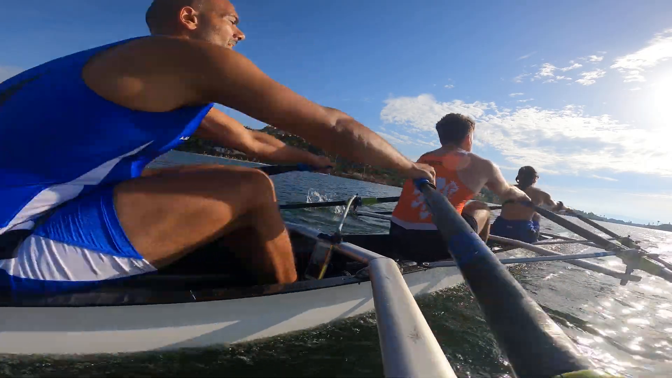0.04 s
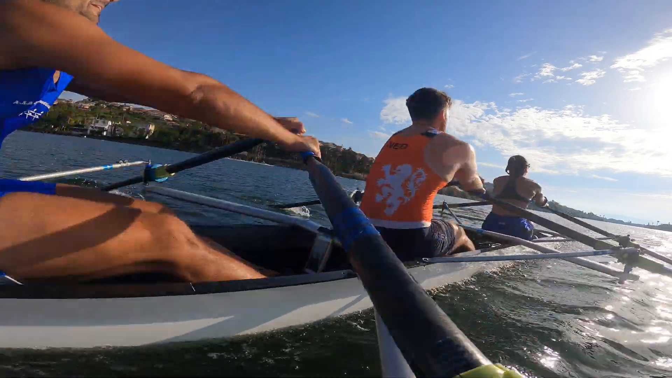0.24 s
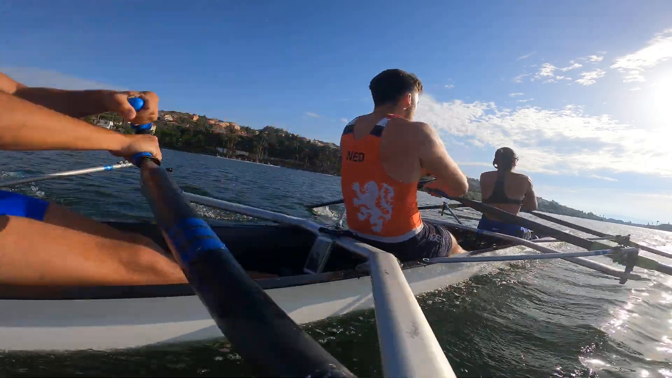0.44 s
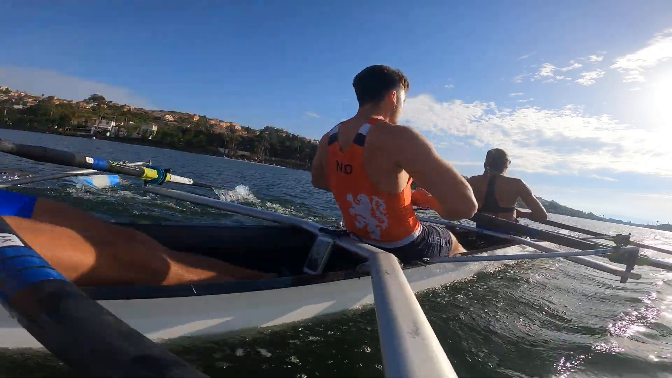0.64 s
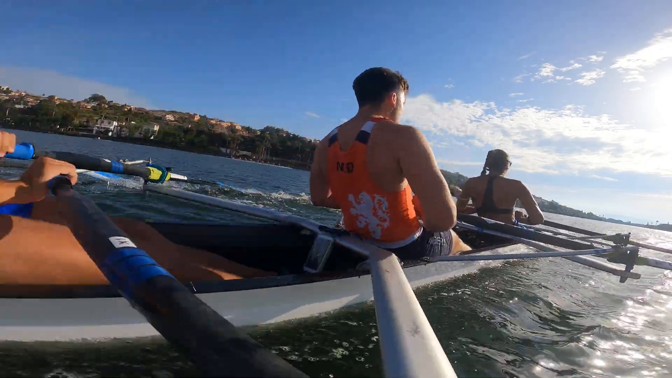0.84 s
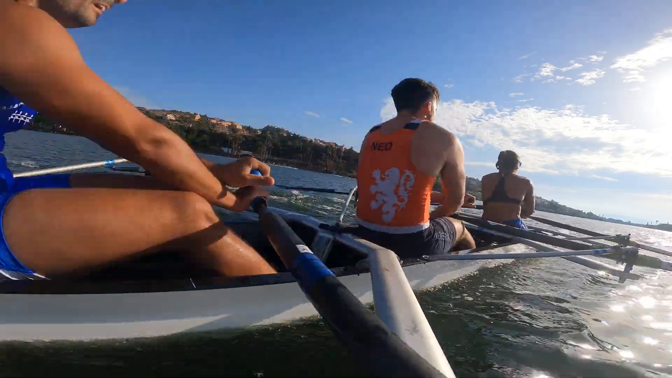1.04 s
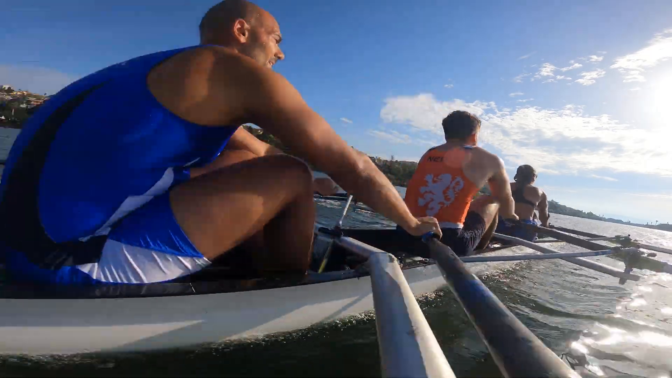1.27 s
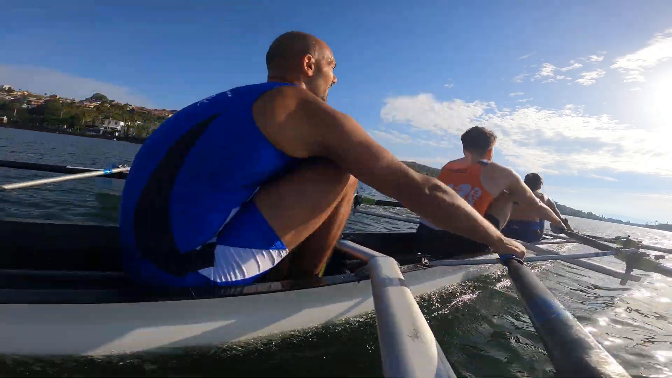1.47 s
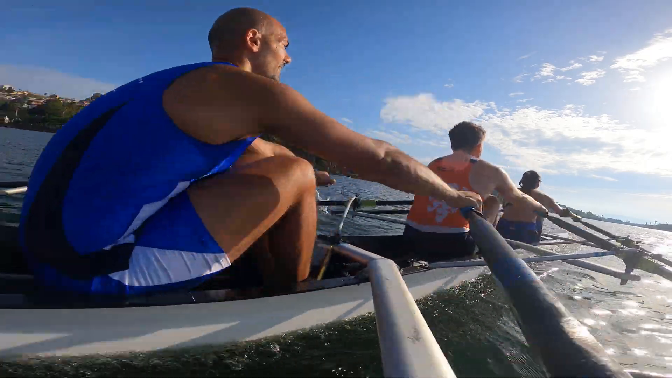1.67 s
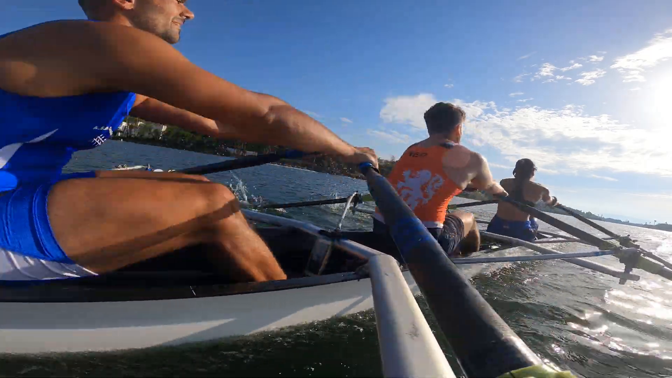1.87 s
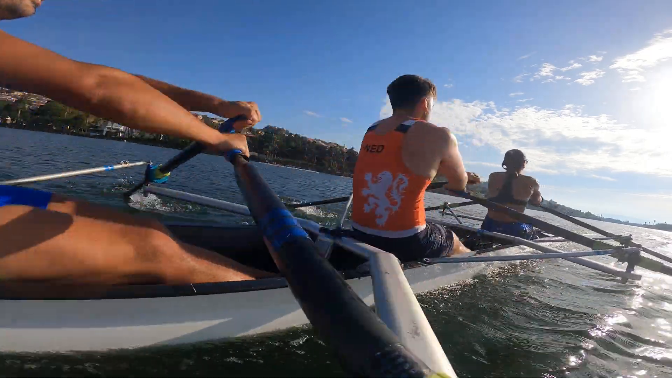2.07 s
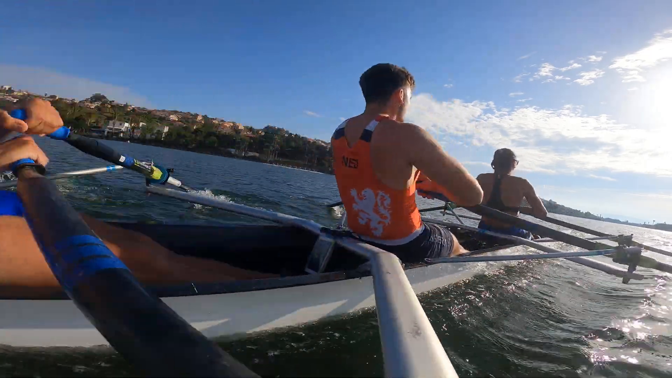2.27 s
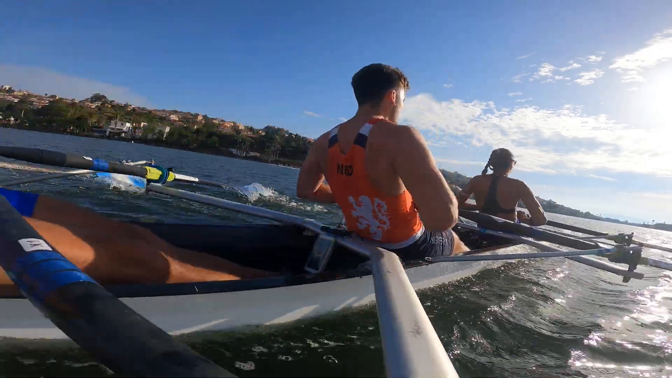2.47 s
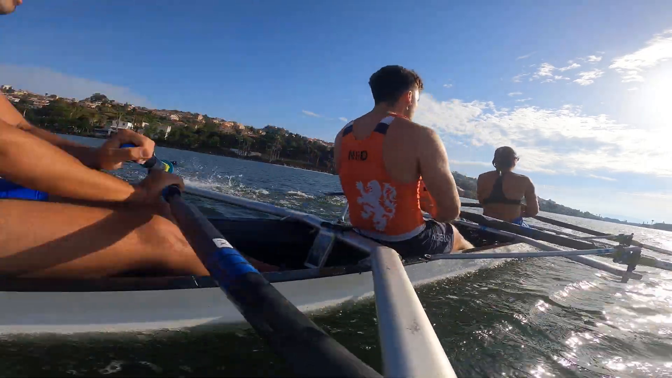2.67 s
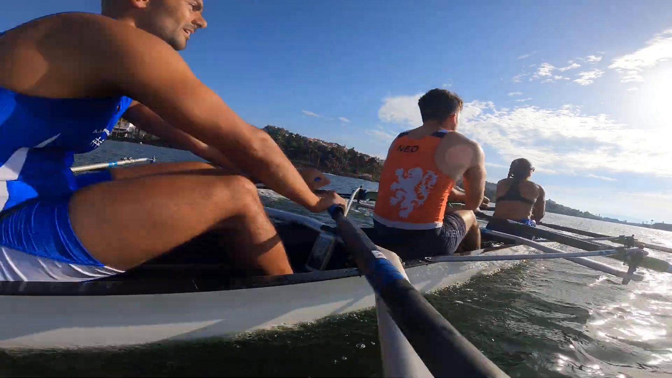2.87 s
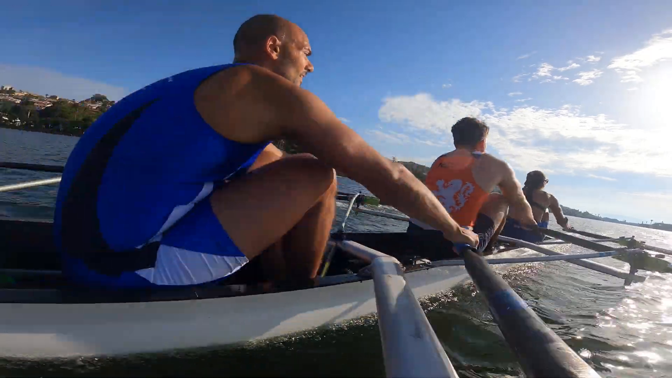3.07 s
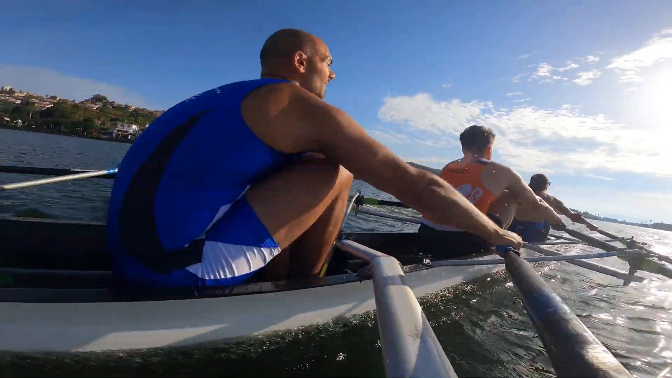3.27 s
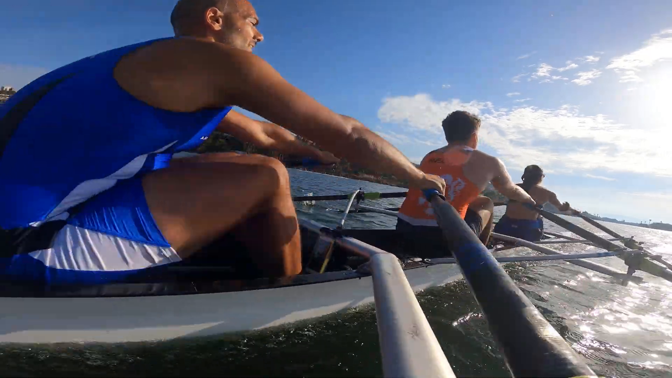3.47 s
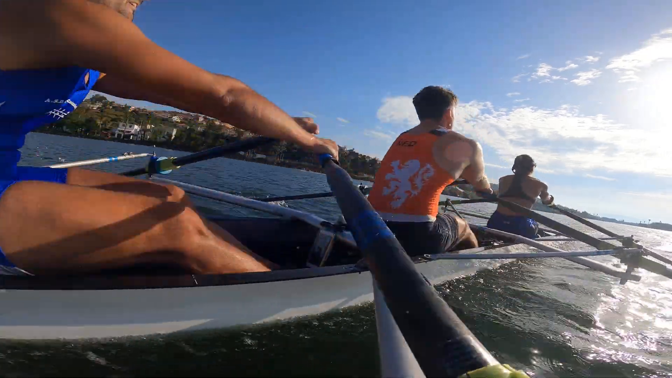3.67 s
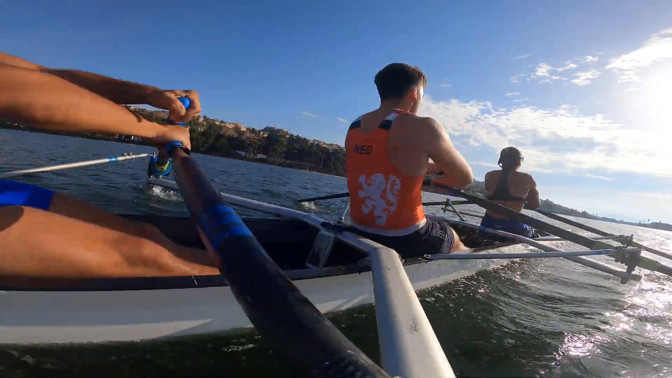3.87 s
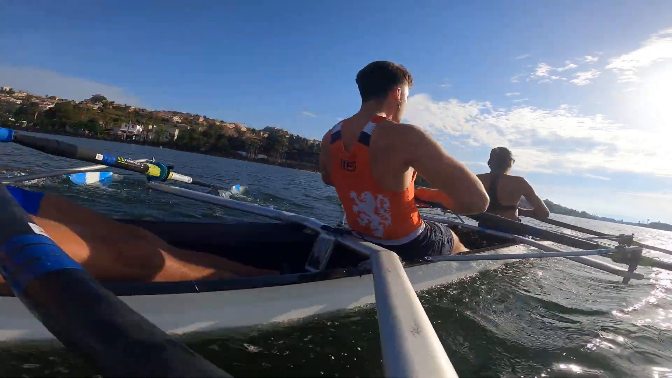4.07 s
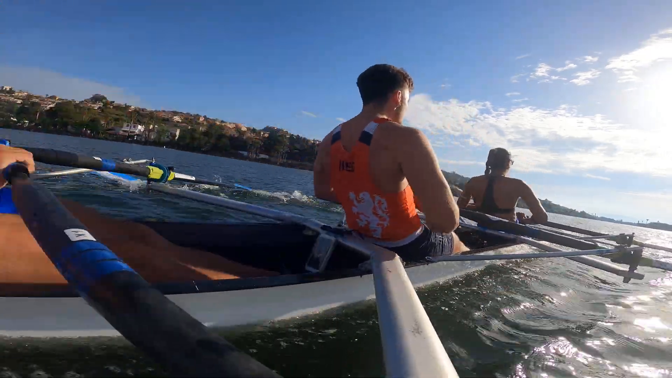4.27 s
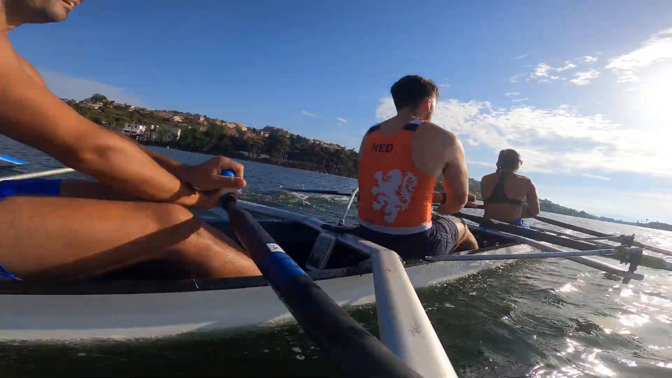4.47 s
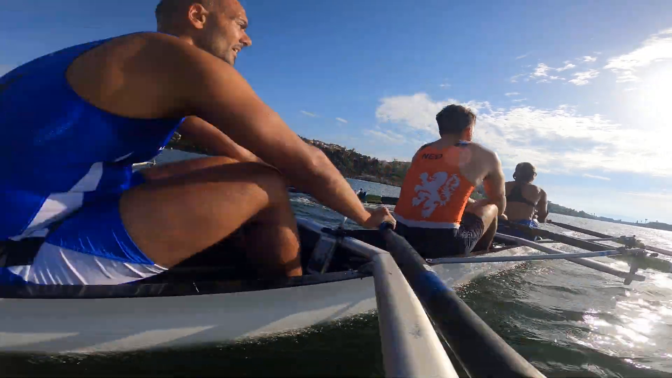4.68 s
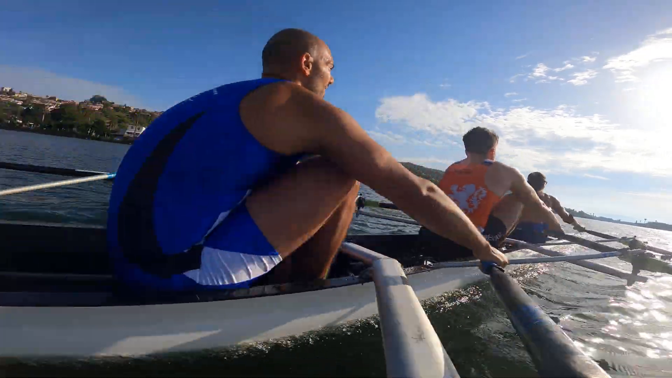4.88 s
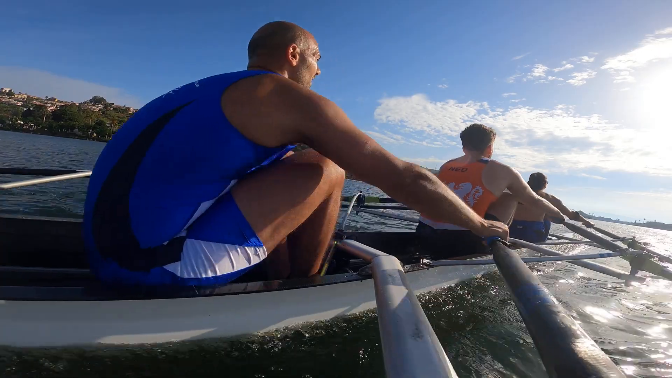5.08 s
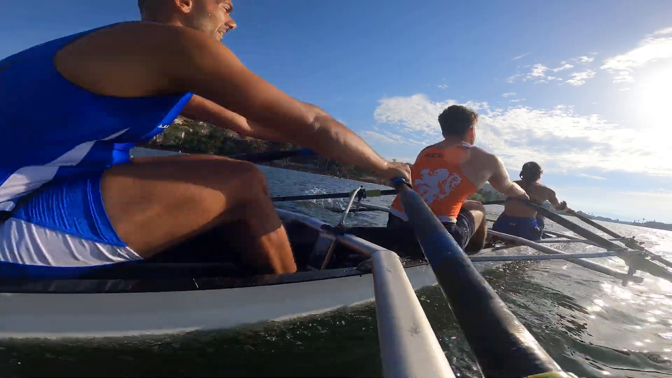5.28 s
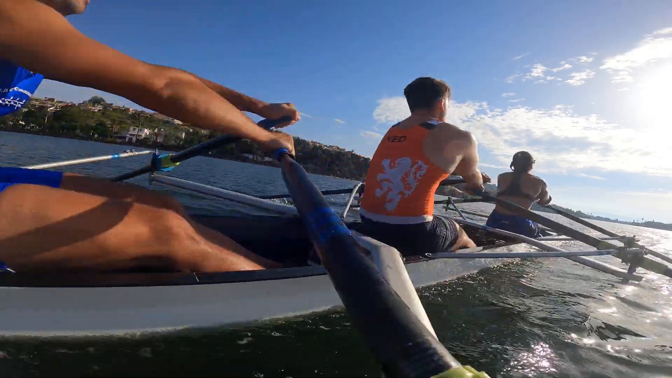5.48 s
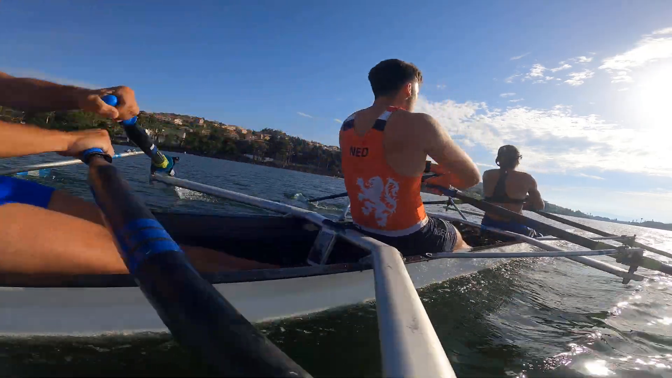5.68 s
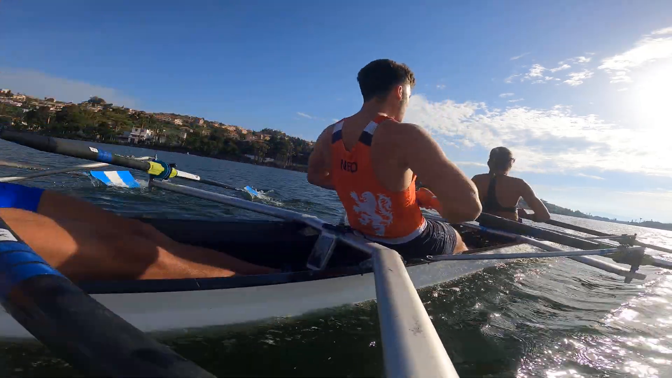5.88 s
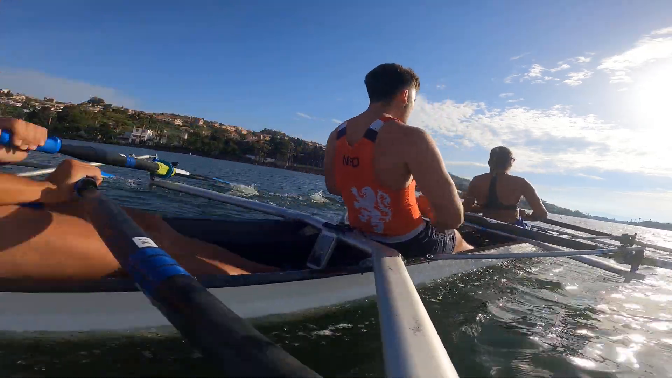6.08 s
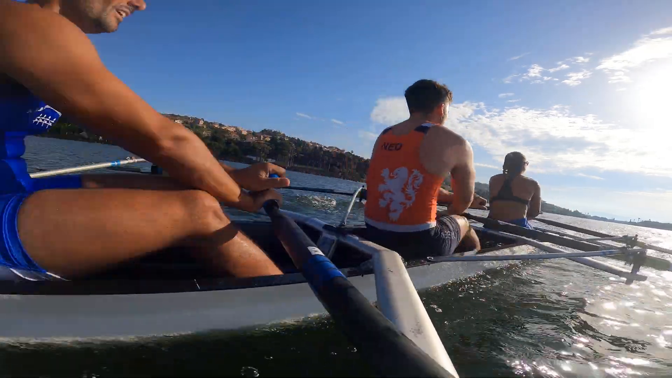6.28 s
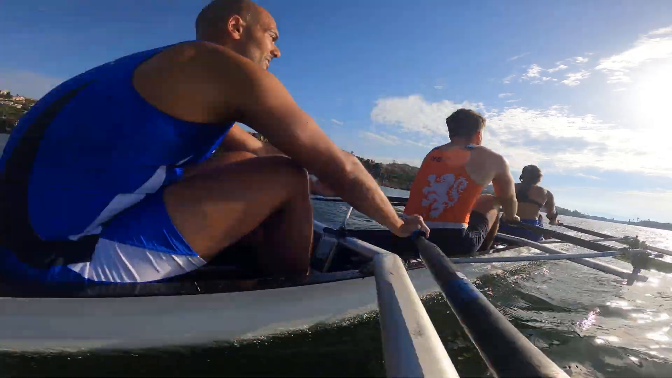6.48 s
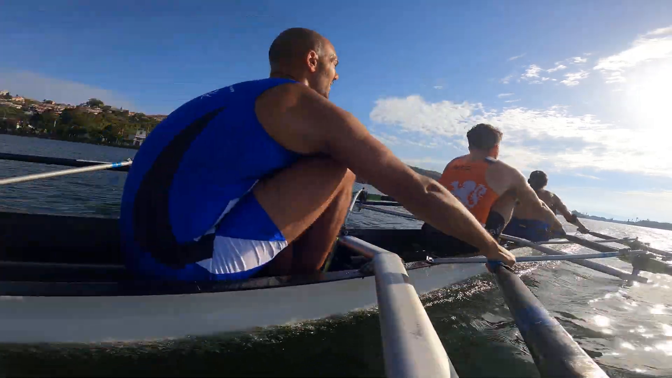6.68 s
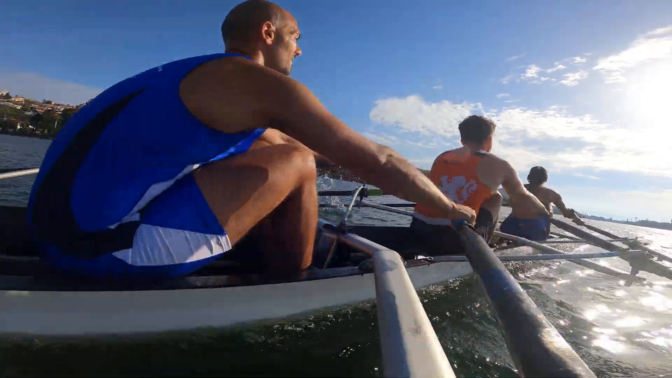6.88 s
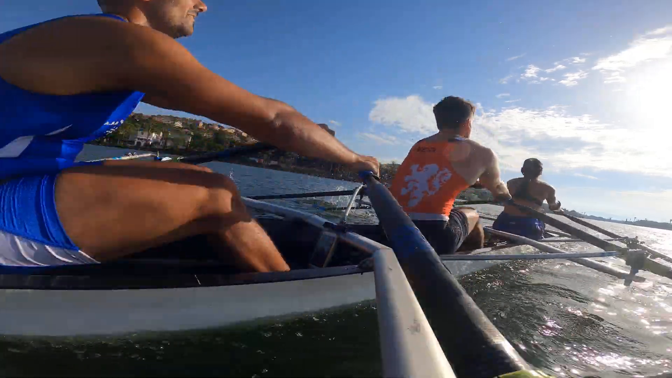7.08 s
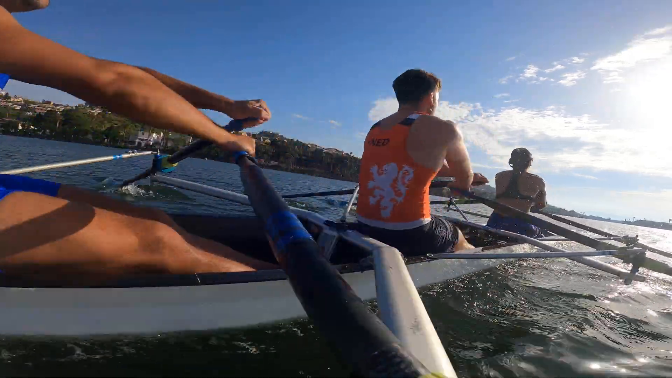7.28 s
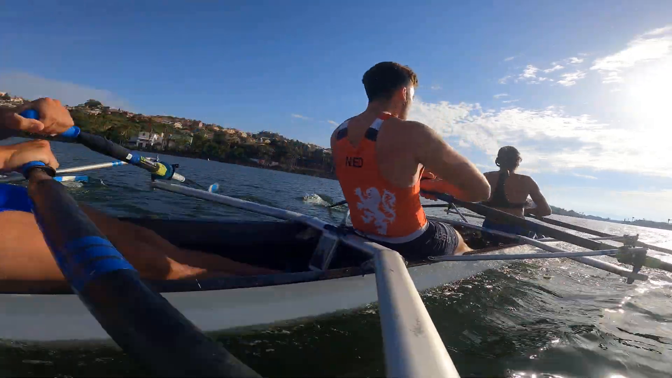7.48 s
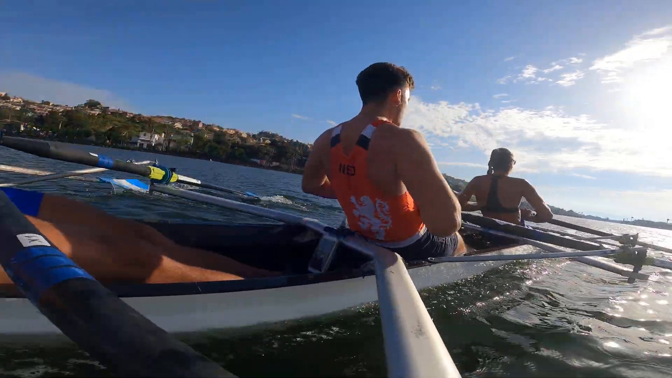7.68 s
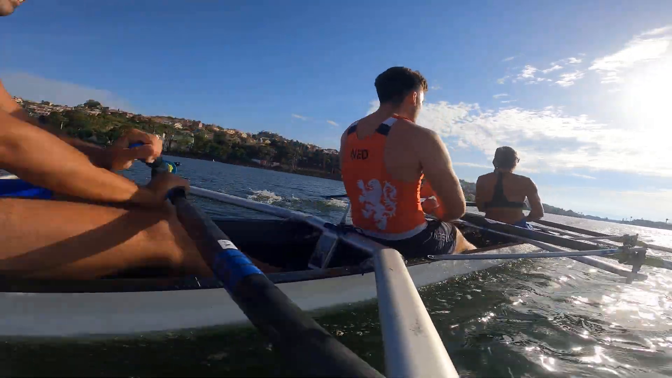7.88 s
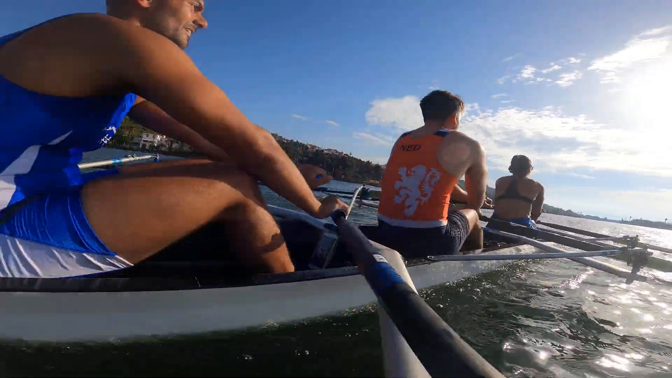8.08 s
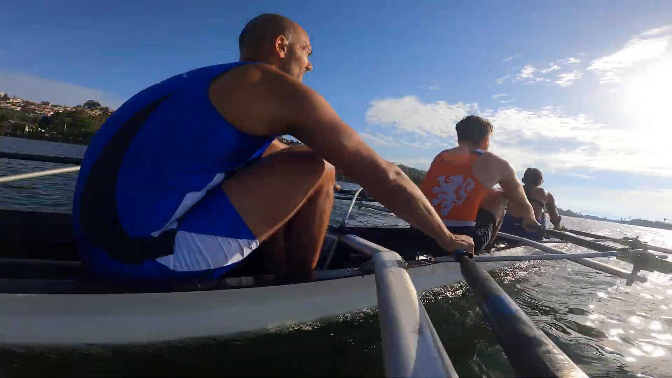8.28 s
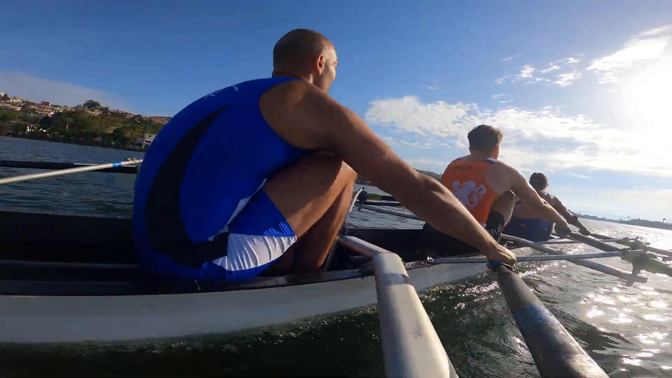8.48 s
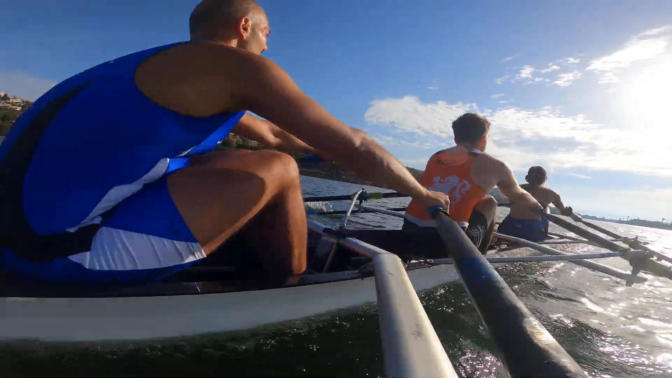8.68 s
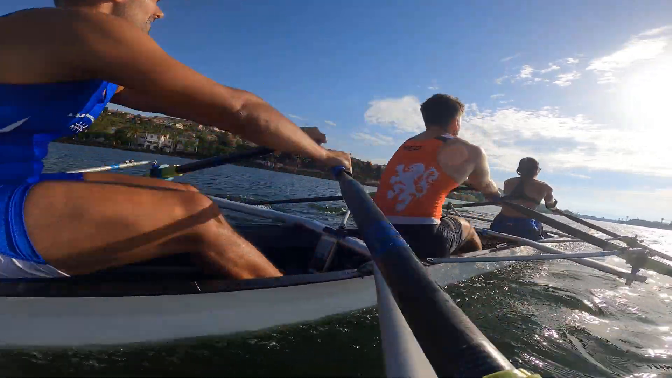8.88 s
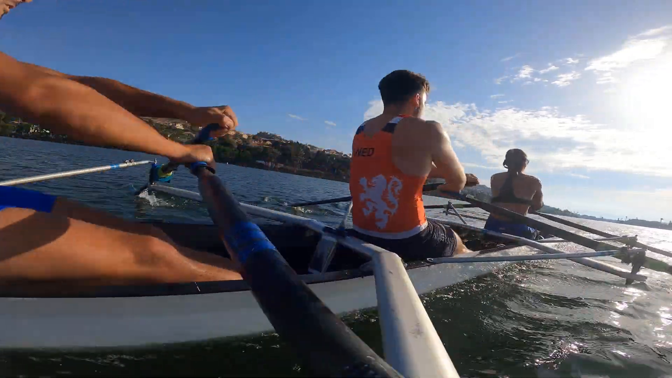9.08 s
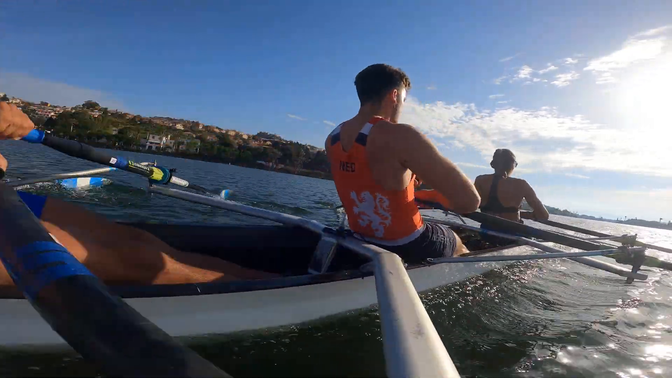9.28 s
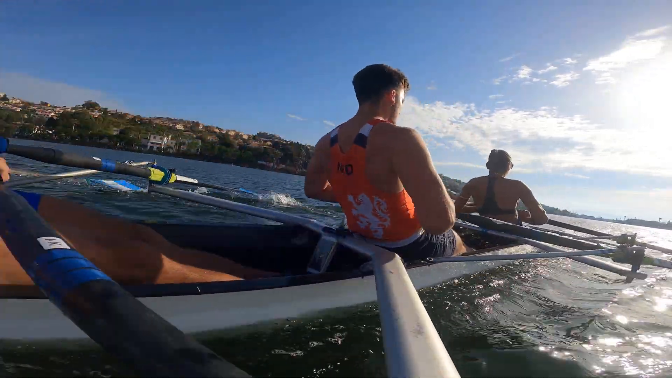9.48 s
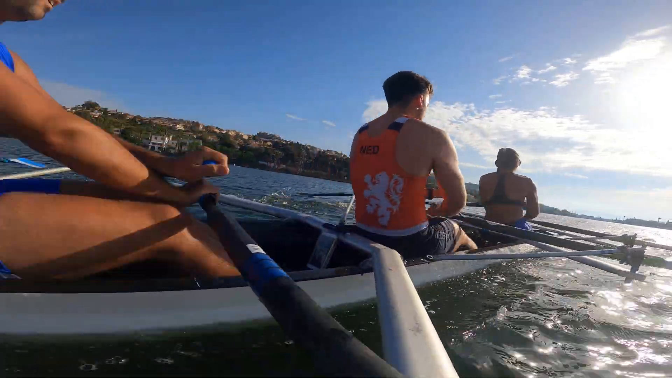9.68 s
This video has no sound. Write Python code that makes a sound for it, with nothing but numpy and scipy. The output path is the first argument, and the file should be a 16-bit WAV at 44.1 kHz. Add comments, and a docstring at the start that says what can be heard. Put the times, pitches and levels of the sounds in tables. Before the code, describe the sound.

Close to the water on a fast rowing boat, six strokes pass in just under ten seconds. Hollow seat rumbles with scrappy rattling accompany leg drives at about 0, 1.8, 3.5, 5.2, 6.9 and 8.7 s, each swelling with a rush of water. The rumble then drops away while the blades pull, leaving softer rushing. Sudden hull knocks and splashes mark the finishes near 0.7, 2.4, 4.2, 5.9, 7.6 and 9.4 s, with brief wavering oarlock squeals at all but the fifth. Rolling recoveries whirr from about 1.3, 3.0, 4.7, 6.4 and 8.2 s. Low soft booms sound as weight shifts. Bubbly trickles, spray and rounded gulps cluster irregularly, especially around 2.4-3, 6 and 9.5 s. Lumpy low wind buffets the microphone, strongest around finishes, beneath faint treble fizz and a few tiny bright ticks.

```python
"""A hull rumbles under rolling seats as water rushes past: a rowing four at race pace, close above the water.
Random bumps ring the hull modes, and soft pushes make the lowest one boom; free seat wheels whirr and rattle.
Grainy noise and small rings make the water rush, splash, trickle and gulp to the rhythm of the stroke.
At most strokes a wavering tone squeals as the oar turns in its lock.
Behind it lie wind noise buffeting the microphone, a treble fizz and hiss, and a few very bright ticks."""
import sys
import numpy as np
from scipy import signal
from scipy.io import wavfile
from scipy.ndimage import uniform_filter1d

SR = 44100
rng = np.random.default_rng(int(sys.argv[2]) if len(sys.argv) > 2 else 0)


def materialize(psi):
    """Save the field psi as 16-bit PCM at rate SR to the path in sys.argv[1].

    A 1-D psi becomes a single channel; in a 2-D psi each row is a channel.
    """
    bounded = np.clip(np.atleast_2d(psi).T, -1, 1)
    quanta = np.round(bounded * 32767).astype(np.int16)
    wavfile.write(sys.argv[1], SR, quanta)


N = 429534  # length in samples


def from_db(db):
    """Gain of a level in dB."""
    return 10 ** (np.asarray(db) / 20)


def power_db(power):
    """Level in dB of a power."""
    return 10 * np.log10(power)


def rms_one(x):
    """Scaled to rms 1."""
    return x / np.sqrt(np.mean(x ** 2) + 1e-20)


def in_time(rows, outside=None):
    """Columns after the time column, drawn as lines with one value a sample."""
    s, *columns = np.transpose(rows)
    return [np.interp(np.arange(N) / SR, s, c, outside, outside) for c in columns]


def drift(rate_hz):
    """Slow chance of rms 1: noise at every 20th sample through two equal one-poles, already run in."""
    r = np.exp(-2 * np.pi * rate_hz * 20 / SR)
    noise = rng.standard_normal(N // 20 + 2002)
    slow = signal.lfilter([1], [1, -2 * r, r * r], noise)[2000:]
    return np.interp(np.arange(N) / 20, np.arange(len(slow)), rms_one(slow))


def resonance(x, hz, width_hz):
    """Two-pole peak of about unit gain."""
    r = np.exp(-np.pi * width_hz / SR)
    poles = [1, -2 * r * np.cos(2 * np.pi * hz / SR), r * r]
    return signal.lfilter([(1 - r * r) / 2, 0, (r * r - 1) / 2], poles, x)


def band(x, low_hz, high_hz, order=2):
    """Butterworth band-pass."""
    return signal.sosfilt(signal.butter(order, [low_hz, high_hz], "band", fs=SR, output="sos"), x)


def dulled(x, hz):
    """Steep low-pass that takes the treble off."""
    return signal.sosfilt(signal.butter(4, hz, fs=SR, output="sos"), x)


def coloured(source, spectrum, own_db=0., own_rate=10.):
    """Two source rows dealt in turn to half-octave bands, each with its level and its own flicker."""
    hz, db = np.transpose(spectrum)
    edges = hz[0] * 2 ** np.arange(0, np.log2(hz[-1] / hz[0]) + .25, .5)
    out = 0
    for k, (low, high) in enumerate(zip(edges, edges[1:])):
        middle_db = np.interp(np.log(low * high) / 2, np.log(hz), db)
        out = out + band(source[k % 2], low, high) * from_db(middle_db + own_db * drift(own_rate))
    return out


def grains(per_s, spread_db):
    """Two rows of random clicks of uneven size; rms 1."""
    sizes_db = spread_db * np.minimum(rng.exponential(1, (2, N)), 5)
    sizes = from_db(sizes_db) * rng.standard_normal((2, N))
    return rms_one(sizes * (rng.random((2, N)) < per_s / SR))


def bubbles(per_s, cycles, low_hz, high_hz):
    """Bubbles born at random ring at one of 24 pitches, the higher the weaker; rms 1."""
    births, dealt = grains(per_s, 2.)[0], rng.integers(0, 24, N)
    rings = 0
    for k, hz in enumerate(np.geomspace(low_hz, high_hz, 24)):
        ring = resonance(births * (dealt == k) + 1e-18, hz, hz / cycles)
        rings = rings + ring * (low_hz / hz) ** 1.9
    return rms_one(dulled(rings, high_hz))


def move(rows, shape):
    """Power of each layer over one kind of move: rise, hold with a swell, fall."""
    t, power = np.arange(N) / SR, np.zeros((len(shape), N))
    for s, hull_s, water_s, *levels in rows:
        since = t - s
        holds = (hull_s, water_s, water_s, hull_s)
        for layer, db, hold, (rise, swell, fall) in zip(power, levels, holds, shape):
            before, during = rise * np.minimum(since, 0), swell * np.clip(since, 0, hold)
            after = fall * np.maximum(since - hold, 0)
            layer += from_db(2 * (db + before + during - after))
    return power


# The moves of each stroke. Each row: hold starts in seconds, hull hold in seconds, water hold in seconds,
# then levels as the hold starts: hull rumble in dB, rush in dB, spray in dB; recoveries add wheel whirr in dB.
RECOVERIES = [(1.28, 0.23, 0.2, -18.5, -25.5, -30.5, -25), (3.01, 0.22, 0.26, -18, -27, -33, -24),
              (4.72, 0.24, 0.26, -18, -26, -30, -25.5), (6.44, 0.28, 0.29, -19.5, -23, -39.5, -32),
              (8.2, 0.23, 0.21, -17.5, -22, -40, -28)]  # seats roll towards the stern
DRIVES = [(.02, 0.19, 0.21, -16, -25.5, -33), (1.77, 0.16, 0.18, -15.5, -22, -40),
          (3.48, 0.23, 0.22, -16.5, -23.5, -33), (5.2, 0.25, 0.23, -17.5, -24, -30.5),
          (6.94, 0.28, 0.22, -17.5, -23, -30.5), (8.69, 0.23, 0.26, -15.5, -24.5, -32)]  # legs push the seats back
PULLS = [(.4, .26, 0.32, -61, -33.5, -38.5), (2.15, 0.31, 0.22, -32, -32, -44),
         (3.88, 0.069, 0.2, -31.5, -30.5, -40), (5.6, 0.12, 0.18, -51, -28, -38),
         (7.32, 0.18, 0.18, -31, -27.5, -39), (9.06, 0.079, 0.23, -28.5, -30.5, -36)]  # arms drag the blades through the water at the end of the drive
FINISHES = [(.7, 0.19, 0.15, -20, -24.5, -44), (2.425, 0.22, 0.18, -20, -26, -37),
            (4.15, 0.18, 0.19, -17.5, -27.5, -41.5), (5.87, 0.22, 0.32, -16.5, -27, -41),
            (7.564, 0.282, 0.39, -16.5, -27.5, -37.5), (9.35, 0.31, 0.35, -21.5, -27, -42.5)]  # blades leave the water
# How each move swells, one row each for hull, rush, spray and, in recoveries, whirr.
# Each row: rise in dB per second, swell while held in dB per second, fall in dB per second.
RECOVERY_SHAPE = [(77, 14, 93), (82.5, 2.5, 97.5), (40, -32, 71), (94, -19, 85)]
DRIVE_SHAPE = [(150, -4.5, 98), (145, 7.5, 88), (150, -18.5, 68)]
PULL_SHAPE = [(60, 3.9, 82), (60, 6, 120), (60, 1, 66)]
FINISH_SHAPE = [(400, -2.5, 370), (350, 3, 260), (150, 15.5, 19)]
# The bed between moves. One row: hull in dB, rush in dB, spray in dB.
GLIDE_DB = (-44.5, -40.5, -47)
# What every stroke does to the background; adds to the slow change below.
# Each row: share of the stroke since the finish (0 to 1), wind in dB, mist in dB, hiss in dB.
CYCLE = [(0, -3, -4, 0), (.05, -5.5, -1, -2), (.13, -3, 1, -10), (.19, -7.5, 3, -6), (.24, -4.5, -0.5, -6),
         (.3, -4.5, -1, -7), (.4, -4, -4, -5), (.455, 1, -4, -6), (.57, -4.5, 0, -5), (.63, -8, 4, 0),
         (.72, -9, -6, -6), (.83, -17, -5, -6), (.94, -10.5, -1.5, -1), (1, -5.5, -2, -1)]
# Slow change over the piece. Each row: time in seconds, wind in dB, mist in dB, hiss in dB.
SLOW_CHANGE = [(0, -16, -54, -66), (.8, -13.5, -57.5, -67), (1.6, -21.5, -59.5, -66),
               (2.5, -14.5, -53, -67), (3.3, -20.5, -55.5, -67), (4.3, -15.5, -52.5, -65),
               (5.1, -18.5, -61, -75), (6, -15, -51.5, -66), (6.9, -15, -58.5, -72), (7.7, -12.5, -51, -75),
               (8.5, -15, -60, -74), (9.2, -10, -54.5, -79), (9.74, -13.5, -55, -80)]
STROKE_S = 1.72  # stroke length before the first finish and after the last


def stroke():
    """Rowing rhythm: phase since the finish, then levels in dB of the layers driven by moves and by cycle."""
    *recovery, whirring = move(RECOVERIES, RECOVERY_SHAPE)
    rolls = recovery + move(DRIVES, DRIVE_SHAPE)
    glide = from_db(2 * np.array(GLIDE_DB))[:, None]
    rest = move(PULLS, PULL_SHAPE) + move(FINISHES, FINISH_SHAPE) + glide
    rolled_hull, knocked_hull = rolls[0] + 1e-20, rest[0]
    rush, spray = (rolls + rest)[1:]
    ends = [row[0] for row in FINISHES]
    ends = [ends[0] - STROKE_S, *ends, ends[-1] + STROKE_S]
    phase = np.interp(np.arange(N) / SR, ends, np.arange(len(ends))) % 1
    share, *columns = np.transpose(CYCLE)
    cycle = [np.interp(phase, share, c) + slow for c, slow in zip(columns, in_time(SLOW_CHANGE))]
    by_move = [power_db(p) for p in (whirring, rolled_hull, knocked_hull, rush, spray)]
    return phase, *by_move, *cycle


# Modes of the hull and rigger under the seats; the first is also the boom of the thumps.
# Each row: pitch in Hz, width of the narrower of its two peaks in Hz, relative level in dB when seats roll,
# relative level in dB when knocked.
HULL_MODES = [(101.1, 8.7, -14.5, -14), (193, 67.6, -7, 0), (250, 45.3, 0, -0.5), (289, 95, -8, -4.5),
              (1544, 125, -24.5, -24)]


def hull(roll_db, knock_db):
    """Dense uneven bumps ring the hull modes, each a steep double peak, in a rolling and a knocked balance."""
    bumps = grains(2500., 1.27) * from_db(1.0 * drift(12.0))
    modes = 0
    for k, (hz, width, *balance_db) in enumerate(HULL_MODES):
        ring = resonance(resonance(bumps, hz, width), hz, 3.4 * width)
        modes = modes + (-1) ** k * from_db(balance_db)[:, None] * ring  # neighbours in opposite polarity
    rolled, knocked = modes
    return from_db(roll_db) * rms_one(rolled) + from_db(knock_db) * rms_one(knocked)


# The hull booms as weight shifts. Each row: start in seconds, boom level in dB before the soft attack,
# added shake of the knocked hull in dB before the soft attack.
THUMPS = [(0.59, -20, -13), (0.776, -2, -20), (0.903, -9, -26), (1.459, -2, -22), (2.45, -5, -1.5),
          (3.057, -7, -28), (3.188, -1, -3), (4.238, -5.5, -14), (4.318, -10, -25), (4.797, -13, -26),
          (4.929, -5, -14), (5.928, -23, -28), (6.347, -21, -16), (6.466, -6, -26), (6.654, -20, -21),
          (7.564, -14, -30), (8.106, -8, -22), (8.399, -11, -24), (9.309, -5, -12)]
THUMP_RISE_S, THUMP_T60_S = 0.027, 0.23  # attack time constant, time to fall 60 dB


def thumps(knock_db):
    """A soft push swings the lowest hull mode; returns it and the knocked-hull level with the shake added."""
    booms, shake, t = np.zeros(N), from_db(2 * knock_db), np.arange(SR // 3) / SR
    push = from_db(-60 * t / THUMP_T60_S) * (1 - np.exp(-t / THUMP_RISE_S))
    swing = push * np.sin(2 * np.pi * HULL_MODES[0][0] * t)
    for s, db, shake_db in THUMPS:
        at = round(s * SR)
        booms[at:at + len(t)] += (from_db(db) * swing)[:N - at]
        shake[at:at + len(t)] += (from_db(shake_db) * push[:N - at]) ** 2
    return booms, power_db(shake)


WHIRR_HZ, WHIRR_WIDTH_HZ = 950, 220  # pitch, width of the narrower of two peaks


def whirr(level_db):
    """Seat wheels running free sing in one steep resonance of the tracks."""
    bumps = grains(2500., 0.64)[0]
    once = resonance(bumps, WHIRR_HZ, WHIRR_WIDTH_HZ)
    return from_db(level_db) * rms_one(resonance(once, WHIRR_HZ, 2 * WHIRR_WIDTH_HZ))


# Colour of the wheel jolts. Each row: frequency in Hz, relative level in dB per Hz.
JOLT_SPECTRUM = [(500, 6), (1200, -1), (3000, -11.5), (5000, -24.5)]
JOLTS_PER_S, JOLT_DB = 80., -15.5  # level against the hull rumble
JOLT_POLE_T60_S = 0.027  # 60 dB fall of each of the two poles that shape a jolt


def rattle(hull_db):
    """Wheels knock over rough spots at random: scrappy bursts through tracks and rigger, colour flickering."""
    fall = from_db(-60 / (JOLT_POLE_T60_S * SR))
    hits = np.abs(grains(JOLTS_PER_S, 0)[0]) + 1e-18
    knocks = signal.lfilter([1], [1, -2 * fall, fall * fall], hits)
    scrape = dulled(coloured(grains(6000., 0.92), JOLT_SPECTRUM, own_db=5.5, own_rate=33.0), 5600)
    return from_db(hull_db + JOLT_DB) * rms_one(np.tanh(rms_one(knocks)) * scrape)


# Colours of the low rush and the bright spray. Each row: frequency in Hz, relative level in dB per Hz.
RUSH_SPECTRUM = [(250, -36), (450, 3), (700, -2), (1000, 1.5), (1500, -8.5), (2100, -17.5), (3200, -14),
                 (5000, -66.5)]
SPRAY_SPECTRUM = [(1200, 13), (2200, 4.5), (3200, 3), (4500, -7.5), (6000, -22), (8500, -14)]


def water(rush_db, spray_db, surge):
    """Bubbles and drops in clumps: one surge shakes the low rush and the bright spray together."""
    rush = rms_one(dulled(coloured(grains(6000., 0.89), RUSH_SPECTRUM, own_rate=8.), 6300))
    rush = rush + from_db(-5) * bubbles(400., 21., 420.5, 2540)
    rush = rms_one(rush * from_db(0.82 * surge))
    spray = coloured(grains(8000., 0.73), SPRAY_SPECTRUM, own_db=-0.5, own_rate=13.0)
    spray = rms_one(dulled(spray * from_db(1.34 * surge), 7740))
    spray = spray + from_db(-13) * bubbles(250., 27.0, 2160, 5100)  # drops falling back
    return from_db(rush_db) * rush + from_db(spray_db) * rms_one(spray)


# Splashes. Each row: start in seconds, body level in dB, treble against the body in dB;
# both levels are before the attack and the final trims.
SPLASHES = [(0.2219, -27, -51), (0.701, -23, -22), (0.7924, -28, -17), (0.882, -26, -22), (0.925, -27, -27),
            (1.1189, -35.5, -10), (1.205, -29, -22), (1.3134, -23, -38), (1.635, -26, -35),
            (1.731, -28, -19), (1.7908, -26, -28), (2.433, -25, -19), (2.622, -21.5, -20),
            (2.708, -29, -14), (2.788, -22, -32), (2.825, -21, -24), (2.835, -23.5, -21),
            (2.898, -24.5, -30), (2.952, -27, -27), (3.0929, -25, -31), (3.206, -34, -30),
            (3.249, -37, -11), (3.5559, -39, -3), (4.174, -26, -21), (4.2967, -37, -10), (4.5236, -35, -30),
            (4.571, -27.5, -30), (4.925, -23, -41), (5.3602, -28, -29), (5.7, -28, -30), (5.907, -27, -28),
            (5.956, -21.5, -36), (6.006, -24, -30), (6.12, -24.5, -20), (6.4476, -27, -23),
            (6.718, -22.5, -38), (6.884, -29, -30), (6.948, -28, -25), (7.021, -17.5, -39),
            (7.6531, -29, -21), (7.7653, -24.5, -30), (8.095, -20.5, -28), (8.8164, -27, -18),
            (9.4056, -29, -27), (9.468, -23.5, -33), (9.589, -21.5, -30), (9.6294, -25.5, -19),
            (9.68, -22, -16), (9.694, -40, -12)]
# Colour of a splash body. Each row: frequency in Hz, relative level in dB per Hz.
SPLASH_SPECTRUM = [(350, -0.5), (800, 15.5), (1500, 11), (3000, 7), (5000, -10.5), (7500, -39)]
SPLASH_RISE_S, SPLASH_T60_S = 0.0022, 0.044  # attack time constant, time to fall 60 dB
SPATTER_S, SPATTER_DB = .012, -11  # two drops follow within this time, weaker by once to twice this


def splashes():
    """Each splash is a grainy burst with a quick rise and a spatter after it, some brighter than others."""
    body, treble, t = np.zeros(N + SR), np.zeros(N + SR), np.arange(SR // 8) / SR
    burst = from_db(-60 * t / SPLASH_T60_S) * (1 - np.exp(-t / SPLASH_RISE_S))
    for (s, db, treble_db), chance in zip(SPLASHES, rng.random((len(SPLASHES), 2))):
        spatter = [(c * SPATTER_S, SPATTER_DB * (1 + c)) for c in chance]
        for late, loss_db in [(0, 0), *spatter]:
            at = round((s + late) * SR)
            body[at:at + len(t)] += from_db(db + loss_db) * burst
            treble[at:at + len(t)] += from_db(db + treble_db + loss_db) * burst
    low = rms_one(coloured(grains(7000., 0.86), SPLASH_SPECTRUM, own_db=3.0, own_rate=33.0))
    high = rms_one(dulled(band(grains(9000., 1.5)[0], 5500, 8900), 11500))
    return from_db(6.5) * body[:N] * low + from_db(2.0) * treble[:N] * high


# Air pockets gulping shut; the 250 Hz row at 4.513 s is a low knock, rung the same way. # Each row: start in
# seconds, level in dB before the attack and a 9 dB lift, starting pitch in Hz.
GULPS = [(0.599, -15.5, 960), (1.633, -21, 860), (1.71, -18, 795), (2.419, -16.5, 500), (2.434, -10, 1500),
         (2.627, -12, 2530), (2.792, -30, 1030), (2.83, -16, 580), (3.882, -19, 700), (4.513, -23, 250),
         (4.523, -16, 2120), (4.607, -14, 558), (5.712, -13, 503), (5.912, -11, 1020), (5.959, -21, 656),
         (6.134, -16, 925), (6.163, -7, 736), (7.661, -12, 990), (7.72, -10, 670), (8.098, -13, 1560),
         (8.565, -10.5, 1450), (9.525, -7, 1550), (9.595, -10, 1430)]


def gulps():
    """A closing air pocket, or once a low knock, swells and rings, falling 60 dB in 20 cycles, rising in pitch
    and wobbling in level."""
    out, t = np.zeros(N), np.arange(SR // 10) / SR
    attack = 1 - np.exp(-t / 0.0029)
    for s, db, hz in GULPS:
        at, phase = round(s * SR), 2 * np.pi * hz * t * (1 + 1.7 * t)
        ring = from_db(db + 9.0 - 60 * t * hz / 20.0) * attack * np.sin(phase)
        out[at:at + len(t)] += ring[:N - at]
    return out * (1 + 0.41 * drift(350.0))


def plink(hz, cycles, t):
    """A bubble falls 60 dB in the given cycles of its starting pitch, rising in pitch as it dies."""
    age = t * hz / cycles
    return from_db(-60 * age) * (1 - np.exp(-t / 0.0013)) * np.sin(2 * np.pi * hz * t * (1 + 0.2 * age))


TRICKLES_PER_S, TRICKLE_DB, TRICKLE_CYCLES = 220, -8.5, 16.5  # middling rate, level against the rush, middling ring


def trickles(rush_db):
    """Water running off hull and blades: clumps of small plinks at scattered pitches."""
    out, t = np.zeros(N + SR), np.arange(SR // 20) / SR
    born = np.flatnonzero(rng.random(N) < TRICKLES_PER_S * from_db(4. * drift(7.)) / SR)
    for at, (pitch, size, length) in zip(born, rng.random((len(born), 3))):
        hz = 800 * 5. ** pitch
        drop = plink(hz, TRICKLE_CYCLES * (.5 + length), t)
        out[at:at + len(t)] += from_db(-14. * size - 11. * pitch) * drop
    return from_db(rush_db + TRICKLE_DB) * rms_one(out[:N])


# The oar turning in its lock, one list a squeal.
# Each row: time in seconds, pitch in Hz before the waver, level in dB before smoothing and flicker.
SQUEALS = [
    [(.704, 1024, -15), (.725, 1170, -27), (.752, 1240, -17), (.79, 1127, -33)],
    [(2.452, 1183, -10), (2.472, 1078, -26), (2.49, 1260, -27), (2.525, 1093, -18.5), (2.555, 1110, -32)],
    [(4.168, 1330, -18), (4.195, 1240, -16.5), (4.265, 1150, -24), (4.29, 1140, -30)],
    [(6.005, 1433, -21), (6.028, 1460, -16.5), (6.065, 1490, -23), (6.115, 1510, -33)],
    [(9.405, 1122, -19), (9.445, 1100, -15), (9.455, 1102, -23), (9.47, 1144, -13), (9.48, 1144, -28),
     (9.505, 1060, -15)],
]


def oarlock():
    """Stick-slip of the sleeve: a rough wavering tone that catches and lets go, wrapped in a narrow hiss."""
    tone, hiss, waver, catch = np.zeros(N), np.zeros(N), drift(87.0), drift(68.0)
    scatter = drift(160.) + 1j * drift(160.)  # spreads the tone into a narrow band
    for rows in SQUEALS:
        hz, db = in_time(rows)[0], in_time(rows, outside=-120)[1]
        turns = np.cumsum(hz * (1 + .024 * waver)) / SR
        swing = uniform_filter1d(from_db(db), size=500) * np.exp(2j * np.pi * turns)
        tone, hiss = tone + swing.imag, hiss + (swing * scatter).imag
    return (0.92 * tone + 0.53 * hiss) * from_db(1.3 * catch)


# Colour of the wind eddies. Each row: frequency in Hz, relative level in dB per Hz.
WIND_SPECTRUM = [(36, -9.5), (50, -6.5), (100, -8), (160, -11.5), (300, -23.5), (700, -39)]
DEEP_HZ, DEEP_DB, DEEP_FADE_DB = 41.7, -3.5, 10.5  # upper edge, level against eddies at the finish, loss by the next


def wind(level_db, phase):
    """Lumpy pressure of eddies passing the microphone port, over deep uneven surges strongest after the finish."""
    eddies = coloured(rng.standard_normal((2, N)), WIND_SPECTRUM, own_db=2.5, own_rate=7.3)
    deep = rms_one(band(rng.standard_normal(N), 17.7, DEEP_HZ)) * from_db(2.2 * drift(5.1))
    deep_db = DEEP_DB - DEEP_FADE_DB * uniform_filter1d(phase, size=4000)
    return from_db(level_db) * (rms_one(eddies) + from_db(deep_db) * deep)


def mist(mist_db, hiss_db, surge):
    """Tiny drops fizz in the treble up to a sharp edge, under a thin band of smooth noise."""
    spectrum = [(4500, 4.0), (6500, -9.0), (9000, -9.5), (11500, -7.5)]  # (Hz, relative dB per Hz)
    fizz = coloured(grains(9000., 1.5), spectrum, own_db=2.0, own_rate=11.0)
    fizz = dulled(dulled(fizz, 10900), 10900)
    hiss = dulled(band(rng.standard_normal(N), 11900, 15300, order=3), 13500)
    return from_db(mist_db + 0.83 * surge) * rms_one(fizz) + from_db(hiss_db) * rms_one(hiss)


# Very bright ticks. Each row: start in seconds, starting level in dB.
TICKS = [(0.6974, -46), (2.4334, -45), (3.5583, -51), (4.1759, -51), (5.9054, -49)]
TICK_T60_S = 0.029  # time to fall 60 dB


def ticks():
    """Short puffs of the highest treble: band noise that starts at once and dies fast."""
    level, t = np.zeros(N), np.arange(SR // 10) / SR
    for s, db in TICKS:
        at = round(s * SR)
        level[at:at + len(t)] += from_db(db - 60 * t / TICK_T60_S)[:N - at]
    return level * rms_one(band(rng.standard_normal(N), 11300, 20000, order=3))


def scene():
    """All sources at one microphone in the open."""
    phase, whirr_db, roll_db, knock_db, rush_db, spray_db, wind_db, mist_db, hiss_db = stroke()
    booms, knock_db = thumps(knock_db)
    hull_db = power_db(from_db(2 * roll_db) + from_db(2 * knock_db))
    surge = drift(7.7) + 0.5 * drift(33.0)  # water comes in clumps
    mix = hull(roll_db, knock_db) + booms + whirr(whirr_db) + rattle(hull_db)
    mix = mix + water(rush_db, spray_db, surge) + splashes() + gulps() + trickles(rush_db)
    mix = mix + oarlock() + wind(wind_db, phase) + mist(mist_db, hiss_db, surge) + ticks()
    return mix[None]


CUTOFF_HZ = 15900  # from here up everything is at least 70 dB down


def record(dry):
    """Peaks are rounded by soft saturation, then a very steep low-pass cuts the top."""
    rounded = 0.62 * np.tanh(dry / 0.76)
    return signal.sosfilt(signal.cheby2(22, 70, CUTOFF_HZ, fs=SR, output="sos"), rounded)


dry = scene()
out = record(dry)
materialize(out)
```